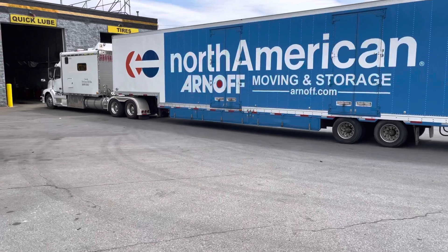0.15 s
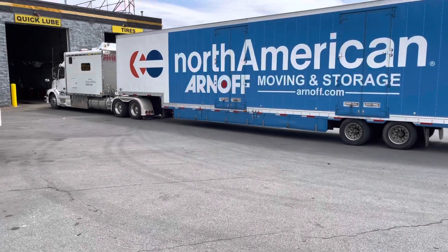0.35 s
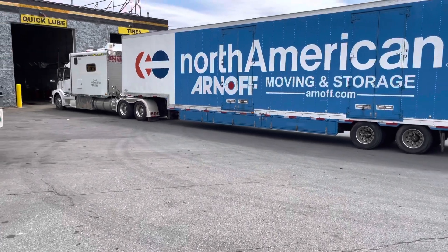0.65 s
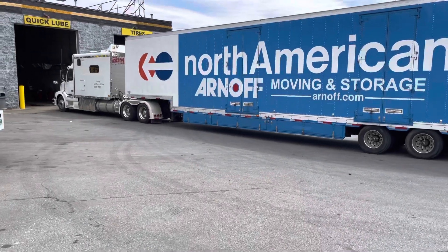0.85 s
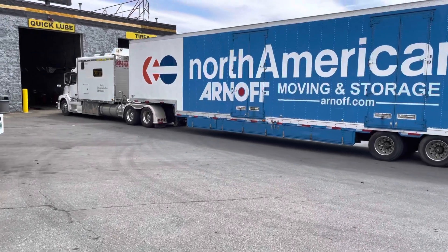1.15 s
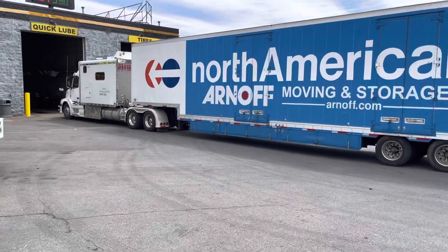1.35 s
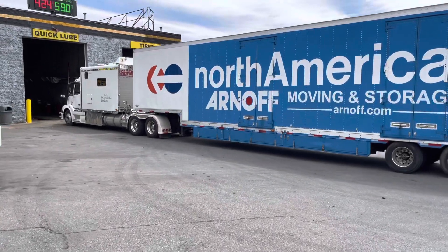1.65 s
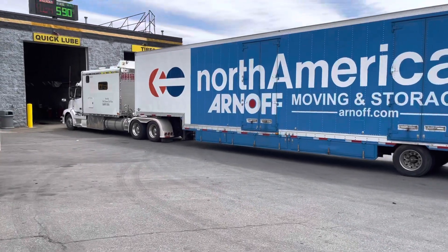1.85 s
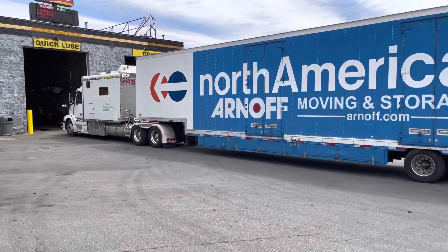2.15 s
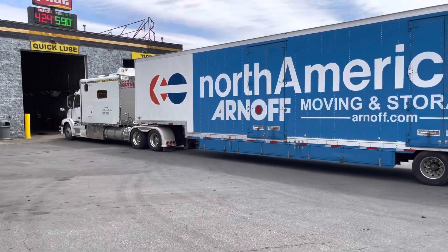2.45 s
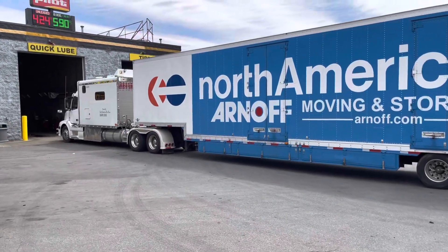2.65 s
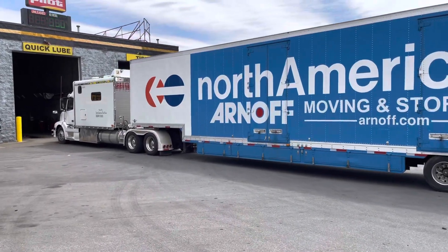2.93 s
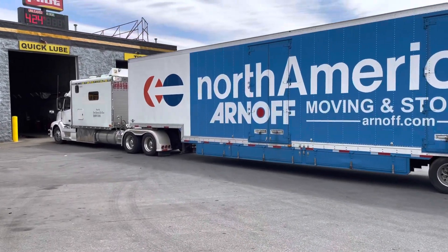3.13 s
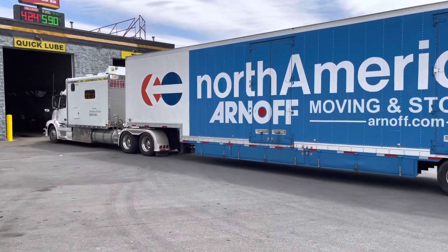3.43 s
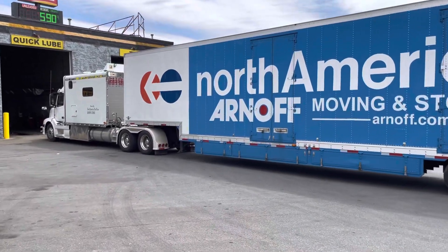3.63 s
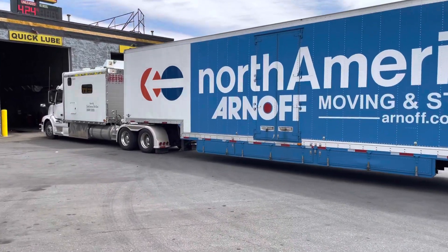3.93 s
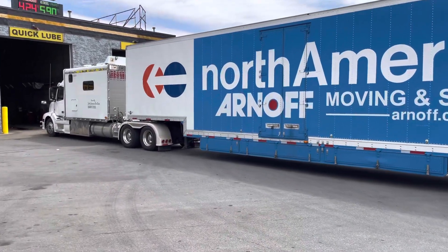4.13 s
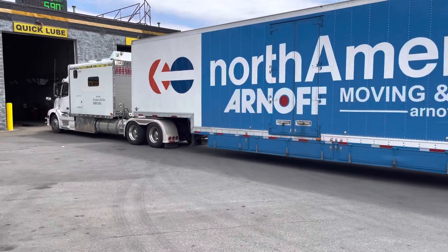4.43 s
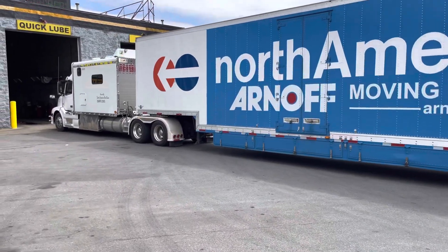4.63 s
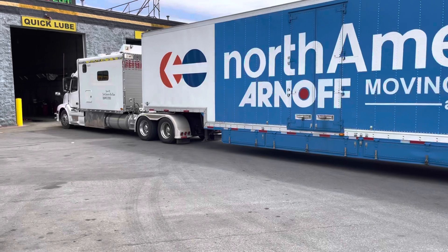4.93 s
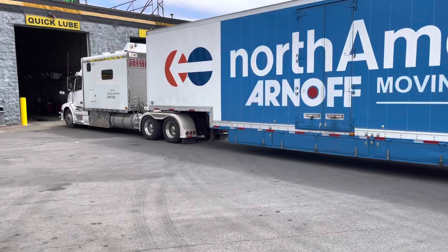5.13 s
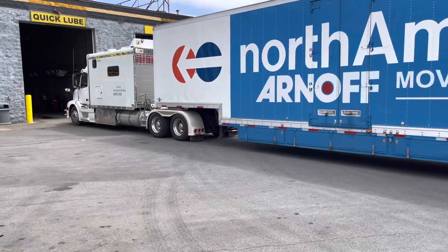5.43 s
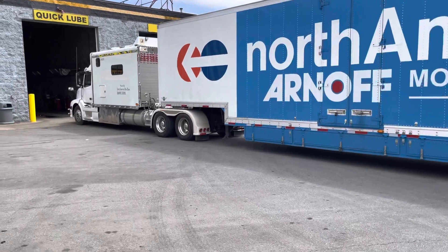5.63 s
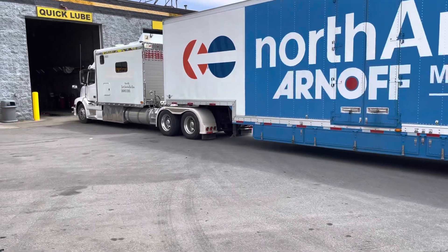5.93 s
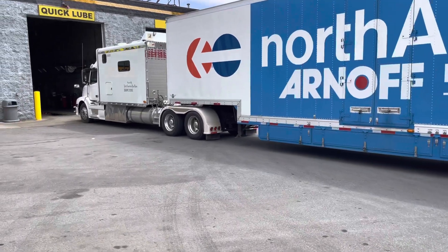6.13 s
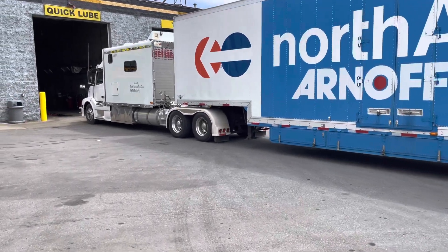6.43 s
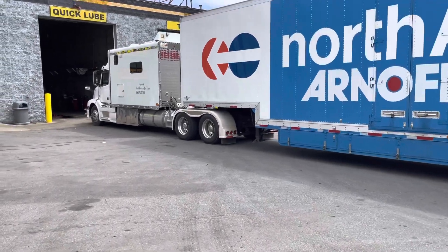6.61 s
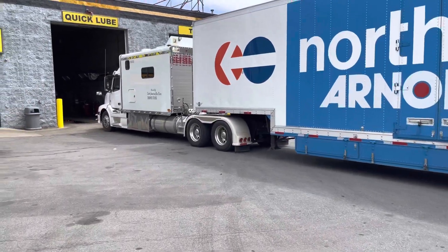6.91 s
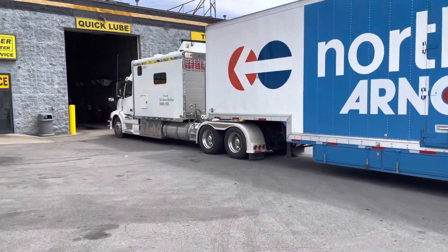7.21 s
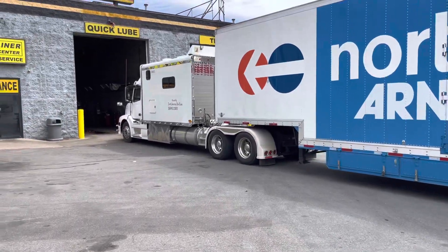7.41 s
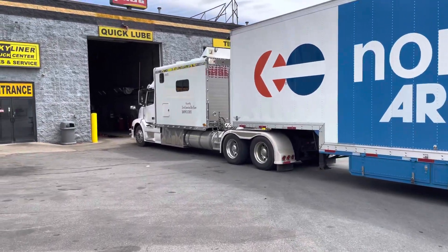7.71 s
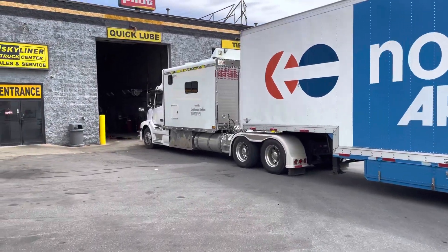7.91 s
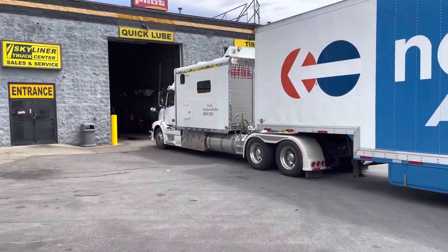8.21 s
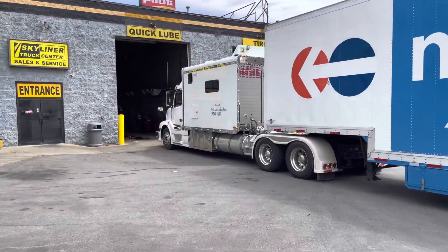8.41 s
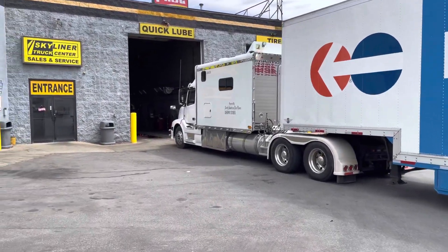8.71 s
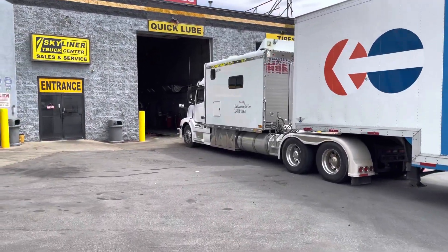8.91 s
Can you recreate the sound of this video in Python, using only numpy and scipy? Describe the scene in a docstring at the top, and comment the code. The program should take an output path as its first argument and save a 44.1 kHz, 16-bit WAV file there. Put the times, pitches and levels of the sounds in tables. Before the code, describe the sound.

Steady diesel drone and airy road roar outdoors, a deep falling engine boom swelling early then fading, small gravel ticks and a late shoe scuff.

```python
"""A lorry diesel idles across a paved lot, three faint puffs a cycle; a second engine drones, a machine hums
and road roar and hiss fill the air. A vehicle further off rolls past and slows from the start on: its falling
boom swells and dips, strongest at 2-4 s, and its tyre roar fades near 2.4 s. Grit clicks underfoot from 0.5 s,
a stone knocks at 5.85 s, a shoe scuffs from 8.7 s. The walker carries a small two-port microphone.
Engines are sums of unsteady sines, the air is shaped noise, grit is short bursts and decaying modes."""
import sys
import numpy as np
from scipy import signal
from scipy.fft import rfft, irfft, next_fast_len
from scipy.io import wavfile
from scipy.ndimage import uniform_filter1d, map_coordinates

SR = 44100
rng = np.random.default_rng(int(sys.argv[2]) if len(sys.argv) > 2 else 0)


def dump(signal):
    """Clip the signal to [-1, 1] and save it as 16-bit WAV at the path in sys.argv[1]."""
    limited = np.clip(np.atleast_2d(signal).T, -1, 1)
    pcm = np.round(limited * 32767).astype(np.int16)
    wavfile.write(sys.argv[1], SR, pcm)


def ratio_of_db(decibels):
    """Turn decibels (scalar or array-like) into linear amplitude factors; 0 dB maps to 1."""
    return 10 ** (np.asarray(decibels, float) / 20)


N = 399546
T = np.arange(N) / SR
IDLE_HZ = 5.432  # lorry engine cycles a second


def unit(x):
    """Scale to rms 1."""
    return x / np.sqrt(np.mean(x ** 2) + 1e-20)


def along(points, hz):
    """Interpolate columns of (freq_hz, value, ..) on a log frequency axis."""
    f, *cols = np.transpose(points)
    return [np.interp(np.log(hz + 1), np.log(f + 1), c) for c in cols]


def curves(rows):
    """One value per sample for each column after the time."""
    s, *cols = np.transpose(rows)
    return [np.interp(T, s, c) for c in cols]


def wobble(rate_hz):
    """Smooth random curve with rate_hz knots a second."""
    knots = rng.standard_normal(int(N * rate_hz / SR) + 4)
    return map_coordinates(knots, [T * rate_hz])


def filtered(x, response):
    """Apply a complex response of frequency to x."""
    m = next_fast_len(N + 8192)
    return irfft(rfft(x, m) * response(np.fft.rfftfreq(m, 1 / SR)), m)[..., :N]


def shaped(x, spectrum):
    """Filter x to a (freq_hz, relative_db) spectrum at rms 1."""
    return unit(filtered(x, lambda hz: ratio_of_db(along(spectrum, hz)[0])))


def rush(spectrum, patchy_db, size=6):
    """Two unrelated noises sharing random gain patches; patches few bins wide sound as wandering resonances."""
    z = signal.stft(rng.standard_normal((2, N)), nperseg=512)[2]
    field = uniform_filter1d(rng.standard_normal(z.shape[1:]), size=size, axis=0)
    field = uniform_filter1d(field, size=14, axis=1)
    pair = signal.istft(z * ratio_of_db(patchy_db * unit(field)), nperseg=512)[1][:, :N]
    return shaped(pair, spectrum)


def tone(cycles, rms_db, drift_cycles, waver_db):
    """A slightly unsteady sine, as two paths a quarter cycle apart."""
    quarter = np.array([[0], [1 / 4]])
    phase = cycles + rng.random() + quarter + drift_cycles * wobble(3)
    return np.sqrt(2) * ratio_of_db(rms_db + waver_db * wobble(4)) * np.sin(2 * np.pi * phase)


def lorry():
    """Exhaust tones at cycle multiples, plus three treble puffs a cycle that grow as the walker nears."""
    # exhaust tones: cycle_multiple, rms_db
    exhaust_tones = [(6, -55), (9, -45), (12, -41), (15, -50), (59, -54)]
    # puffs in each cycle: place_0_to_1, relative_db
    puff_places = [(.0, -5), (.33, 0), (.7, -9)]
    # puff noise spectrum: freq_hz, relative_db
    puff_spectrum = [(3000, -40), (6000, -22), (8800, -14), (9700, 0), (11100, -1), (11700, -12),
                     (12000, -60)]
    exhaust = sum(tone(k * IDLE_HZ * T, db, drift_cycles=0.1, waver_db=3.0) for k, db in exhaust_tones)
    gate = 0
    for place, db in puff_places:
        since_s = ((T * IDLE_HZ - place) % 1) / IDLE_HZ
        gate = gate + ratio_of_db(db - 60 * since_s / .22) * (1 - np.exp(-since_s / .004))  # t60 0.22 s, rise 4 ms
    near_db = np.interp(T, [0, T[-1]], [-68, -58])
    return exhaust + ratio_of_db(near_db + 1.8 * wobble(5.5)) * gate * rush(puff_spectrum, patchy_db=1.5)


def drone():
    """Shaft multiples of the second engine, fading as the walker leaves it and partly returning."""
    shaft_hz = 15.0
    # engine tones: shaft_multiple, db_re_firing_tone
    engine_tones = [(2, -14), (3, 0), (4, -11), (5, -7), (6, -9.5), (9, -24.5)]
    # firing tone level: time_s, rms_db
    firing_level = [(0.0, -26), (1.61, -25), (5.02, -34), (6.43, -33), (7.74, -36), (8.35, -55), (8.8, -37),
                    (9.06, -31)]
    level_db, = curves(firing_level)
    return sum(tone(k * shaft_hz * T, db + level_db, drift_cycles=0.032, waver_db=0.0)
               for k, db in engine_tones)


def machine_hum():
    """Fixed-pitch sines that waver; the strong ones break up with fast level swings."""
    # weak lines: pitch_hz, rms_db
    weak_lines = [(222, -48), (521, -63), (620, -53), (681, -51), (5503, -77)]
    # strong lines: pitch_hz, rms_db before the swings
    strong_lines = [(148.3, -46), (296.3, -51), (443.4, -47)]
    strong = sum(tone(hz * T, db + 4.5 * wobble(12), drift_cycles=.25, waver_db=1.5)
                 for hz, db in strong_lines)
    return strong + sum(tone(hz * T, db, drift_cycles=0.21, waver_db=2.5) for hz, db in weak_lines)


def lot():
    """Noises of traffic, engine and air; roar, clatter and hiss pulse with each firing of the lorry."""
    # levels: time_s, roar_db, engine_clatter_db, narrow_hiss_db
    lot_levels = [(0.0, -35.5, -44.5, -63), (1.51, -33.5, -43, -66), (2.2, -34.5, -42, -66.5),
                  (2.8, -35, -41.5, -62), (3.2, -36, -45, -61), (4.6, -36, -43.5, -63),
                  (5.4, -34.5, -43, -64), (6.66, -35.5, -43.5, -64), (7.8, -34, -44.5, -55.5),
                  (8.6, -33.5, -43.5, -56), (8.8, -33.5, -42, -54), (9.06, -31.5, -44, -55)]
    # levels of deep rumble, throb and air hiss: time_s, level_db
    rumble_level = [(0.0, -38.5), (0.68, -31.5), (2.85, -36), (5.48, -31.5), (6.03, -48), (7.11, -30.5),
                    (7.6, -31.5), (8.1, -32), (8.6, -31), (9.06, -39.5)]
    throb_level = [(0.0, -33.5), (0.7, -31.5), (5.0, -32), (5.7, -30.5), (6.4, -33.5), (7.2, -33.5),
                   (8.2, -33.5), (9.06, -31.5)]
    hiss_level = [(0.0, -57.5), (2.1, -54.5), (4.65, -53.5), (4.94, -50), (5.15, -54), (5.6, -54),
                  (6.11, -51.5), (6.38, -54), (6.84, -52), (7.16, -54.5), (8.3, -54.5), (8.66, -54.5),
                  (8.78, -50.5), (8.96, -48.5), (9.06, -48.5)]
    # noise spectra: freq_hz, relative_db (density)
    rumble_spectrum = [(20, -37), (36, -15), (50, -11), (58, -2.5), (80, -7), (100, 0), (140, -32),
                       (300, -101)]
    throb_spectrum = [(60, -55.5), (110, 1.5), (170, -2), (250, -5.5), (400, -12.5), (700, -32),
                      (1500, -88)]
    roar_spectrum = [(150, -62), (330, -8), (490, -5.5), (670, 0), (850, -2.5), (1100, -8.5), (1350, -9),
                     (1800, -21), (3000, -51.5), (9000, -91)]
    clatter_spectrum = [(600, -51), (1300, 2.5), (1600, -0.5), (2100, -1.5), (2600, -7.5), (3200, -13.5),
                        (8000, -75.5)]
    narrow_spectrum = [(2000, -40), (2800, -7), (3300, 0), (3650, -7), (5000, -40)]
    hiss_spectrum = [(1000, -66), (3200, -5.5), (4000, -0.5), (5700, -2), (6600, -7.5), (6900, -13),
                     (7100, -17.5), (7300, -16.5), (7600, -11), (9400, -15.5), (11100, -19.5), (11700, -29),
                     (12000, -67)]
    rumble_db, = curves(rumble_level)
    throb_db, = curves(throb_level)
    hiss_db, = curves(hiss_level)
    roar_db, clatter_db, narrow_db = curves(lot_levels)
    pulse = np.cos(2 * np.pi * (6 * IDLE_HZ * T + .08 * wobble(5)))  # six firings a cycle
    rumble = ratio_of_db(rumble_db + 0.73 * wobble(7.8)) * rush(rumble_spectrum, patchy_db=0.6)
    throb = ratio_of_db(throb_db + 0.66 * wobble(3.3)) * rush(throb_spectrum, patchy_db=1.0)
    roar = ratio_of_db(roar_db + 0.35 * wobble(7) + .5 * pulse) * rush(roar_spectrum, patchy_db=1.7, size=1)
    clatter = ratio_of_db(clatter_db + .7 * wobble(9) + .7 * pulse) * rush(clatter_spectrum, patchy_db=1.7, size=2)
    narrow = ratio_of_db(narrow_db + 0.5 * wobble(5.7)) * rush(narrow_spectrum, patchy_db=1.2)
    hiss = ratio_of_db(hiss_db + .95 * wobble(10) + .35 * pulse) * rush(hiss_spectrum, patchy_db=1.5, size=3)
    return rumble + throb + roar + clatter + narrow + hiss


def passer():
    """Shaft multiples glide down as the vehicle slows; weak ones swell in the open; whine and moan sink too."""
    # shaft speed: time_s, shaft_hz
    shaft_speed = [(0.0, 28.25), (0.83, 28.0), (1.4, 27.5), (2.0, 27.1), (2.6, 26.45), (3.25, 26.05),
                   (3.7, 25.5), (4.2, 25.3), (4.8, 24.75), (5.28, 24.3), (6.04, 23.31), (6.8, 22.7),
                   (7.8, 22.4), (9.06, 21.9)]
    # boom (4th multiple), 5th multiple, growl (7th): time_s, rms_db
    boom_level = [(0.0, -33), (0.7, -37), (1.03, -31.5), (1.2, -33.5), (1.6, -29), (2.1, -27.5),
                  (2.24, -21), (2.45, -20.5), (2.66, -27), (2.84, -18), (3.0, -18), (3.28, -15.5),
                  (3.66, -19), (3.78, -26), (3.88, -24), (4.01, -25), (4.14, -18), (4.3, -20), (4.53, -24),
                  (4.79, -24.5), (4.95, -21.5), (5.12, -25.5), (5.22, -34.5), (5.45, -43), (5.8, -27),
                  (6.02, -43), (6.17, -27), (6.45, -28), (6.6, -35), (6.85, -35), (7.05, -26.5), (7.2, -34),
                  (7.48, -42), (7.6, -28), (7.82, -23.5), (8.1, -29), (8.35, -33), (8.5, -27), (8.64, -33),
                  (8.8, -27), (8.92, -30), (9.06, -48)]
    fifth_level = [(0, -44.5), (2.1, -47), (2.35, -36), (2.55, -50), (3.68, -50), (3.79, -29), (3.95, -40),
                   (4.08, -31), (4.18, -44), (4.3, -25.5), (4.5, -27.5), (4.65, -42), (5.0, -28.5),
                   (5.15, -39.5), (9.06, -50)]
    growl_level = [(0, -50), (.9, -54), (1.08, -34.5), (1.25, -39.5), (1.45, -56), (1.66, -32.5),
                   (1.95, -45), (2.12, -28), (2.24, -41), (2.42, -35), (2.54, -41), (2.7, -29.5),
                   (2.9, -31.5), (3.3, -35), (3.45, -44), (3.63, -34), (3.73, -46), (3.98, -31),
                   (4.12, -46), (4.3, -31), (4.55, -30.5), (4.77, -29.5), (4.9, -48), (5.12, -34),
                   (5.4, -50.5), (6.9, -42.5), (7.2, -35.5), (7.5, -39.5), (7.7, -48), (9.06, -56)]
    # weak tones: shaft_multiple, db before carry
    weak_tones = [(8, -39), (11, -46), (12, -44)]
    # how freely the weak tones carry across the lot: time_s, gain_db
    carry_gain = [(0.0, -16), (3.4, -14), (3.8, -1), (4.5, 3.5), (5.0, -0.5), (5.35, -7), (6.3, -5),
                  (6.6, -11), (9.06, -12)]
    # faint whine, low early moan: time_s, pitch_hz, rms_db
    whine_track = [(0, 578, -62), (1.0, 572, -56), (1.5, 568, -45.5), (2.2, 565, -50), (2.8, 560, -45),
                   (3.3, 556, -54), (4.1, 548, -56), (4.45, 545, -43), (4.8, 542, -62), (9.06, 520, -80)]
    moan_track = [(0, 77.8, -37), (.2, 78.1, -34), (.95, 78, -29.5), (1.12, 77.2, -37), (1.5, 77.4, -68),
                  (9.06, 77, -90)]
    shaft_hz, = curves(shaft_speed)
    turns = np.cumsum(shaft_hz) / SR
    carry_db, = curves(carry_gain)
    strong = sum(tone(k * turns, curves(level)[0], drift_cycles=.02, waver_db=.35)
                 for k, level in ((4, boom_level), (5, fifth_level), (7, growl_level)))
    weak = sum(tone(k * turns, db + carry_db + 2.5 * wobble(8), drift_cycles=.1, waver_db=2)
               for k, db in weak_tones)
    whine_hz, whine_db = curves(whine_track)
    moan_hz, moan_db = curves(moan_track)
    whine = tone(np.cumsum(whine_hz) / SR, whine_db, drift_cycles=.15, waver_db=3)
    moan = tone(np.cumsum(moan_hz) / SR, moan_db, drift_cycles=.05, waver_db=1)
    return strong + weak + moan + whine


def tyres():
    """A band of tyre roar: shaped noise that holds, then fades on a logistic curve."""
    level_db, gone_s, fade_s = -45, 2.37, 0.2
    # noise spectrum: freq_hz, relative_db (density)
    tyre_spectrum = [(500, -50), (680, -12), (720, 0), (742, -8), (765, 0), (790, -9), (830, -10),
                     (1100, -50)]
    fade = 1 / (1 + np.exp((T - gone_s) / fade_s))
    return ratio_of_db(level_db + wobble(0.94)) * fade * rush(tyre_spectrum, patchy_db=1.0)


def ring(t, hz, db, t60_s):
    """A sine mode with a fast rise and exponential decay."""
    return ratio_of_db(db - 60 * t / t60_s) * (1 - np.exp(-t * hz)) * np.sin(2 * np.pi * hz * t)


def grit():
    """Clicks are band-shaped noise swells of a few ms; stone knocks and pings are decaying modes."""
    swell_s, half_width_hz = 0.0011, 1800
    # clicks: start_s, peak_db before pan, centre_hz, left_over_right_db
    clicks = [(0.536, -32, 6300, 2), (0.546, -39, 6500, 1), (0.6295, -40, 3800, -1),
              (1.1262, -38, 6580, -5), (1.7533, -40, 7350, -4), (2.34, -37, 7940, 0.5),
              (2.603, -35.5, 8300, 11), (2.616, -31, 6520, -2), (3.218, -36, 8320, 6.5),
              (3.853, -38, 7960, 5), (4.029, -38, 5500, 0), (4.6817, -40, 8070, -2), (5.6789, -38, 6560, 1),
              (5.8365, -40, 7000, -3), (5.8545, -33, 6500, -2), (5.854, -35, 8800, -1),
              (5.854, -37, 11000, 0), (5.8685, -37, 10000, 3), (5.8705, -33, 10600, 2),
              (5.871, -35, 3500, -1), (5.8718, -29, 5600, -3), (6.0066, -37, 11000, 3),
              (6.2855, -33, 11300, 3), (6.4741, -38, 8630, -8), (7.463, -40, 6720, -1),
              (7.611, -34, 10500, 1), (7.611, -30.5, 6500, -3), (7.713, -35, 6000, -4)]
    # modes of the knocked stone: pitch_hz, relative_db, t60_s
    stone_modes = [(690, 0, .012), (810, 5, 0.012), (1300, -8, .006), (1920, -8, .007), (2660, -9, 0.006),
                   (3700, -14, .004), (4930, -14, 0.006), (6300, -17, .005)]
    # stone knocks: start_s, level_db
    stone_knocks = [(5.8538, -17), (5.8561, -11.5)]
    # faint pings: start_s, level_db
    faint_pings = [(.7572, -39.5), (4.0288, -39.5)]
    out, t = np.zeros((2, N)), np.arange(SR // 30) / SR
    f = np.fft.rfftfreq(len(t), 1 / SR)
    for s, db, hz, pan_db in clicks:
        envelope = np.exp(-((t - 2 * swell_s) / swell_s) ** 2)
        burst = rng.standard_normal((2, len(t))) * envelope
        band = (f > 1500) / (1 + ((f - hz) / half_width_hz) ** 2)
        burst = irfft(rfft(burst) * band, len(t))
        gain = ratio_of_db(db + np.array([[pan_db / 2], [-pan_db / 2]]))
        out[:, round(s * SR):][:, :len(t)] += gain * burst / abs(burst).max()
    for s, db in stone_knocks:
        out[:, round(s * SR):][:, :len(t)] += ratio_of_db(db) * sum(ring(t, *mode) for mode in stone_modes)
    for s, db in faint_pings:
        out[:, round(s * SR):][:, :len(t)] += ring(t, 3300, db, .03)
    return out


def scuff():
    """A shoe drags over fine grit: dense tiny grains of uneven size that set in and go on."""
    level_db, start_s, rise_s = -51, 8.74, .08
    grains_per_s, spread_db = 1800, 3.5
    # grain spectrum: freq_hz, relative_db (density)
    scuff_spectrum = [(1500, -40), (2000, -8), (2110, 2), (2300, -8), (2520, -6), (2610, 6), (2720, -6),
                      (3050, -8), (3180, 2), (3350, -9), (3700, -8), (3800, 2), (4000, -4), (4400, -14),
                      (5000, -12), (5120, -2), (5280, -10), (5430, -5), (5800, -14), (6580, -9),
                      (7000, -40)]
    hits = rng.random((2, N)) < grains_per_s / SR
    signs = rng.choice([-1, 1], (2, N))
    grains = hits * signs * ratio_of_db(spread_db * rng.exponential(size=(2, N)))
    rise = 1 / (1 + np.exp(np.clip((start_s - T) / rise_s, -50, 50)))
    return ratio_of_db(level_db + 1.5 * wobble(13)) * rise * shaped(grains, scuff_spectrum)


def ports(paths):
    """Mid is the first path; side mixes both paths by frequency, as two spaced ports hear them."""
    # freq_hz, side_over_mid_db, share_following_mid, share_quarter_cycle_off
    port_table = [(45, -18, -.4, 0.1), (100, -15, -0.36, -0.31), (200, -8, -0.27, 0.11),
                  (310, -4.5, -0.24, -0.4), (463, 4, 0.029, -0.14), (700, -3, 0.14, 0.16),
                  (1050, 5, 0.31, 0.1), (1650, 3, 0.03, 0.47), (2300, -0.5, -0.3, 0.072),
                  (3300, 0.5, -0.033, 0.1), (4500, -2.5, -0.014, -0.3), (6000, -1, 0.55, -0.3),
                  (7200, -1, 0.23, -0.5), (8800, -3, .12, -.2), (10100, 6.5, .03, -1), (10900, 6, .03, 0.5),
                  (11600, -14, 0, 0.89)]

    def weights(hz):
        """Gains of the two paths into side."""
        side_db, follows, quarter = along(port_table, hz)
        rest = np.sqrt(np.clip(1 - follows ** 2 - quarter ** 2, 0, 1))
        return ratio_of_db(side_db) * np.array([follows + 1j * quarter, rest])
    side = filtered(paths, weights).sum(axis=0)
    return np.array([paths[0] + side, paths[0] - side])


def scene():
    """Far sources and scuff through the ports, clicks direct; the vehicle leans right as it draws abreast."""
    right_db, abreast_s, sweep_s = 2.5, 4, 0.48
    lean_db = right_db * np.exp(-((T - abreast_s) / sweep_s) ** 2) * np.array([[-.5], [.5]])
    around = ports(lorry() + drone() + machine_hum() + lot() + tyres() + scuff())
    return around + ratio_of_db(lean_db) * ports(passer()) + grit()


def top_cut(x):
    """Nothing passes above the cut-off."""
    return signal.sosfilt(signal.butter(12, 12930, fs=SR, output="sos"), x)


def record(dry):
    """The microphone cuts the deepest bass, below about 36 Hz."""
    heard = filtered(dry, lambda hz: 1 / (1 + (36 / (hz + 1)) ** 8))
    return top_cut(heard)


dry = scene()
out = record(dry)
dump(out)
```